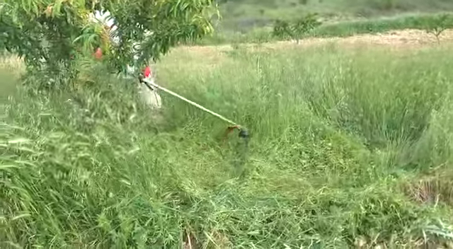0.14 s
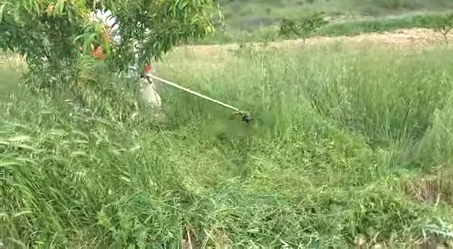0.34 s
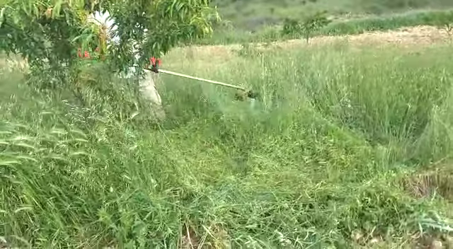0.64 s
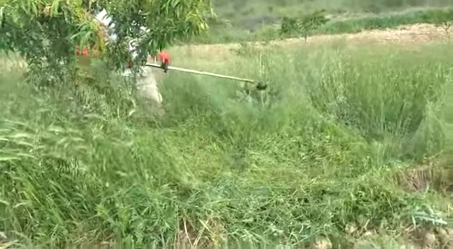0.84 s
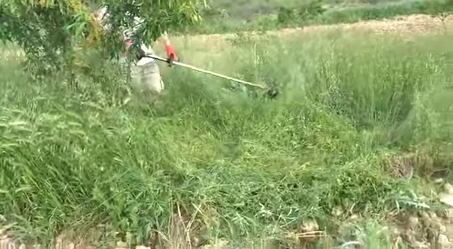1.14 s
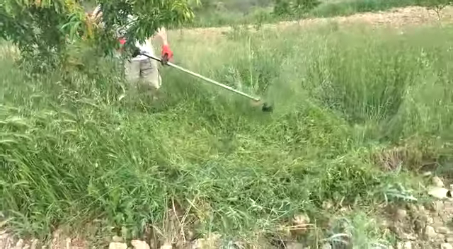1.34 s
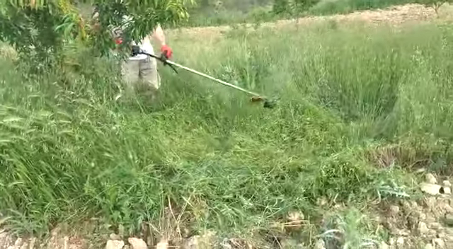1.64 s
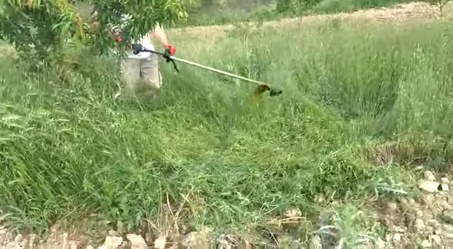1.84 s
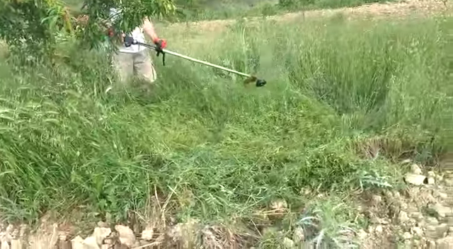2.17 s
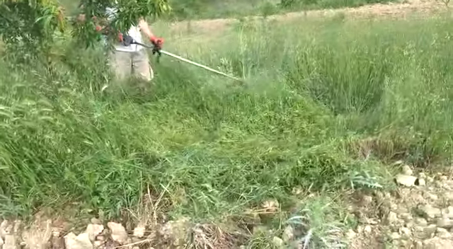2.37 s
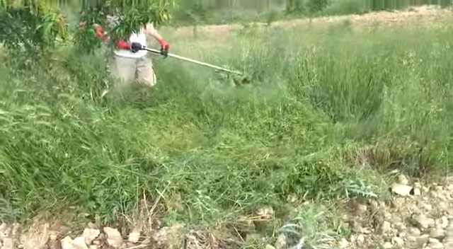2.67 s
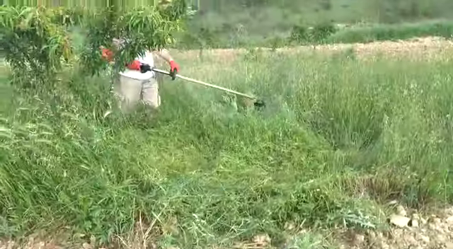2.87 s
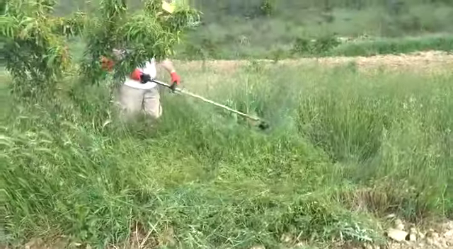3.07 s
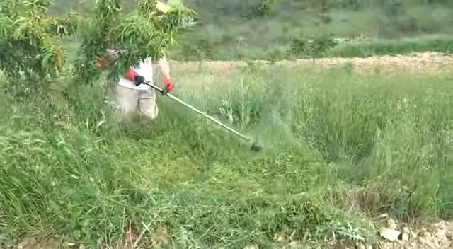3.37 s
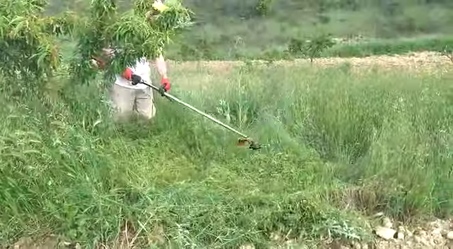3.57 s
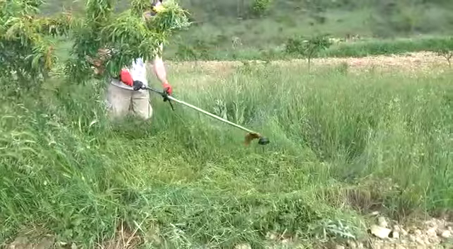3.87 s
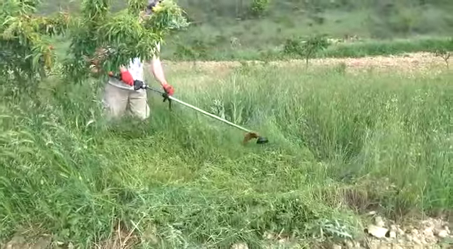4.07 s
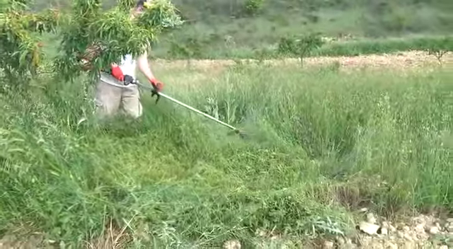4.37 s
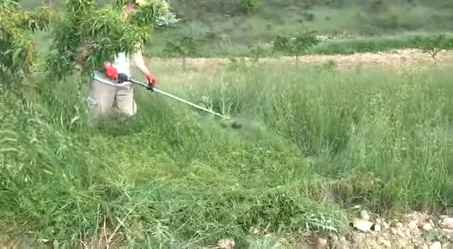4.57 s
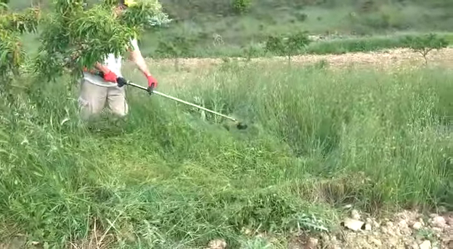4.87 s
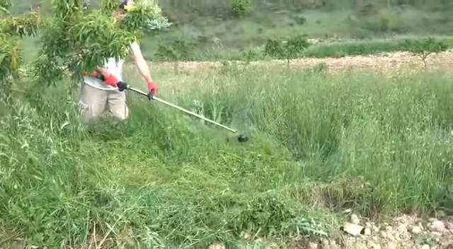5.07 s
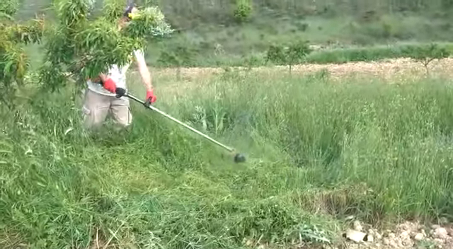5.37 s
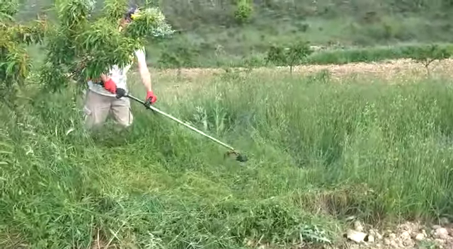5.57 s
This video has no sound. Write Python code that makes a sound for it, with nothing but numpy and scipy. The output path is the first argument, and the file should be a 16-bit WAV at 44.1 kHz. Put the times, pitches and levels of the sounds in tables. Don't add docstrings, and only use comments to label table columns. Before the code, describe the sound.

A two-stroke petrol brushcutter buzzes at high revs outdoors, its note sagging with each bite as nylon line swishes and snaps through tall grass.

```python
import sys
import numpy as np
from scipy import signal
from scipy.fft import rfft, irfft, next_fast_len
from scipy.io import wavfile
from scipy.ndimage import uniform_filter1d

SR = 44100
rng = np.random.default_rng(int(sys.argv[2]) if len(sys.argv) > 2 else 0)


def magnitude_from_level(level_db):
    exponent = np.asarray(level_db, float) / 20
    return 10 ** exponent


def master(y):
    cut = np.clip(np.atleast_2d(y).T, -1, 1)
    pcm = np.round(cut * 32767)
    wavfile.write(sys.argv[1], SR, pcm.astype(np.int16))


N = 252252


def rms_one(x):
    return x / np.sqrt(np.mean(x ** 2) + 1e-20)


def in_time(rows):
    return np.interp(np.arange(N) / SR, *np.transpose(rows))


def at_hz(points, hz, axis=1):
    points = np.array(points)
    return np.interp(np.log(hz + 1), np.log(points[:, 0]), points[:, axis])


def shaped(x, response):
    size = next_fast_len(N + 4096)
    hz = np.arange(size // 2 + 1) * SR / size
    return irfft(rfft(x, size) * response(hz), size)[..., :N]


def band(x, low_hz, high_hz, order=2):
    edges_hz = [low_hz, min(high_hz, .45 * SR)]
    return signal.sosfilt(signal.butter(order, edges_hz, "band", fs=SR, output="sos"), x)


def drift(rate_hz):
    hop = 32
    knots = np.arange(0, N + SR, hop)
    r = np.exp(-2 * np.pi * rate_hz * hop / SR)
    slow = signal.lfilter([1], [1, -2 * r, r * r], rng.standard_normal(len(knots)))
    return np.interp(np.arange(N) + SR, knots, rms_one(slow))


def per_turn(turns):
    return rng.standard_normal(4000)[turns.astype(int)]


# start in seconds, deepest point in seconds, end in seconds, drag in Hz of lost firing rate.
BITES = [(.183, .498, .744, 49.3), (.548, .634, .667, 24.4), (1.068, 1.349, 1.594, 12.8),
         (2.052, 2.33, 2.6, 32.7), (2.428, 2.468, 2.68, 18.1), (3.046, 3.382, 3.628, 18.9),
         (4.021, 4.059, 4.501, 13.5), (4.192, 4.366, 4.642, 34.8), (4.555, 4.578, 4.728, 21.3),
         (5.126, 5.387, 5.611, 30.4), (5.416, 5.463, 5.483, 36.7)]


def speed():
    free_hz, flywheel_s, start_sag_hz = 136.19, .2065, 1.5
    drag = np.zeros(N)
    for start, deepest, end, drag_hz in BITES:
        drag += in_time([(start, 0), (deepest, drag_hz), (end, 0)])
    r = np.exp(-1 / (flywheel_s * SR))
    return free_hz - signal.lfilter([1 - r], [1, -r], drag, zi=[start_sag_hz])[0]


# time in seconds, clearance from -1 to 1.
CLEARANCE = [(0.0, -0.66), (0.19, -0.43), (0.31, -0.24), (0.79, -0.15), (1.19, 0.72), (1.36, 0.21),
             (1.68, -0.61), (1.84, -0.16), (2.13, 0.24), (2.58, -0.28), (2.84, 0.52), (3.15, 0.8),
             (3.64, -0.62), (3.99, 0.37), (4.39, -0.3), (5.04, 1.0), (5.21, 0.67), (5.72, -0.41)]
# time in seconds, turn from -1 to 1.
BODY_TURN = [(0.0, 0.39), (0.36, -0.4), (0.52, 0.12), (0.91, 0.36), (1.31, -0.38), (1.46, 0.12),
             (1.79, 0.49), (2.01, -0.18), (2.39, 0.051), (2.9, 0.35), (3.24, -0.51), (3.49, 0.27),
             (3.86, 0.31), (4.11, -0.55), (4.32, 0.24), (4.99, -0.057), (5.28, -0.49), (5.72, 0.16)]


def levels(laws, hz):
    step = (hz - 125) / 10
    return np.array(laws) @ [np.ones(N), step, step ** 2, in_time(CLEARANCE), in_time(BODY_TURN)]


# frequency in Hz, level in dB.
MUFFLER = [(450, -13), (600, -5.5), (800, -15.5), (950, -8), (1100, -17), (1250, -20.5), (1450, -22),
           (1700, -27.5), (2100, -32), (2420, -22.5), (2700, -39), (2900, -20), (3150, -38)]
PORT_TIMING = [1.5, -1, 1, -1, 3, 3.5, -1, 5, -12, 0.5, 8, 6.5, -4]
# firing order, extra level in dB.
FAN_ORDERS = [(18, 5), (22, 7)]
# frequency in Hz, noise level in dB per Hz.
PUFF = [(40, -37), (100, 2.5), (220, -6.5), (310, -15), (450, -4.5), (900, -6), (1400, -3.5), (2000, -2.5),
        (2700, -39), (3500, -28)]


def exhaust(turns, hz, first_db, third_db, fourth_db, fifth_db, high_db):
    turns = turns + .0018 * drift(45)
    tones = np.zeros(N)
    port_db = dict(enumerate(PORT_TIMING, 4)) | dict(FAN_ORDERS)
    low_db = {1: first_db - .4, 2: first_db - 8.0, 3: third_db - 6.5}
    upper_db = {4: fourth_db, 5: fifth_db}
    for k in range(1, 25):
        muffled_db = upper_db.get(k, high_db) + at_hz(MUFFLER, k * hz) + port_db.get(k, 0)
        level_db = low_db.get(k, muffled_db)
        waver_db = 1.72 * (k > 3) * drift(1.6) + 0.82 * drift(32)
        late = -.12 if k < 6 else 0
        phase = 2 * np.pi * k * (turns - late) - 0.0352 * k * k
        tones += np.sqrt(2) * magnitude_from_level(level_db + waver_db) * np.cos(phase)

    gate = magnitude_from_level(0.28 * np.cos(2 * np.pi * (turns - .1)) + 0.8 * per_turn(turns + 0.33))
    puff = rms_one(shaped(gate * rng.standard_normal((2, N)), lambda f: magnitude_from_level(at_hz(PUFF, f))))
    knock = magnitude_from_level(9 * np.cos(np.pi * (turns - .1)) ** 6 + 2 * per_turn(turns + .4))
    rattle = rms_one(band(knock * rng.standard_normal((2, N)), 1570, 6000))
    return tones * [[1], [0]] + magnitude_from_level(high_db - 10) * puff + magnitude_from_level(high_db - 13.5) * rattle


def hum(head, hum_db):
    tone = np.zeros(N)
    for k, db in [(1, -1.4), (3, -20.5)]:
        tone += magnitude_from_level(db + 0.5 * drift(3)) * np.cos(4 * np.pi * k * head)
    return np.sqrt(2) * magnitude_from_level(hum_db) * tone * [[1], [0]]


# low edge in Hz, high edge in Hz, offset in dB,
# weaker line's deficit in dB, lag in turns of the head.
LINE_BANDS = [(2380, 4190, -1.5, 1, 0.16), (3944, 6700, -5.5, -1.5, 0.061), (7060, 8420, 2, -2.5, 0.19),
              (8700, 11640, -2.5, -1, 0.008), (11350, 15900, 9.5, -4, 0.0039)]
LINE_SWELL = [3, 3.5, 5, 11, 7]
# frequency in Hz, level in dB.
LINE_COLOUR = [(2300, -4.5), (2900, 0), (3400, -2), (4400, 1), (5400, 7), (6800, 7), (8300, -8.5),
               (9500, 11), (11500, -7), (13000, -10), (16000, -8.5)]


def whistle(head, bands_db):
    out, gusty = 0, drift(16.0)
    grit = magnitude_from_level(1.6 * np.minimum(rng.exponential(1, N), 5))
    strength = rng.standard_normal(4000)
    for row, swing_db, level_db in zip(LINE_BANDS, LINE_SWELL, bands_db):
        low_hz, high_hz, offset_db, weak_db, lag = row
        turn = head - lag
        line_pass = 2 * turn + 2.5
        bite = 1.1 + .3 * strength[line_pass.astype(int)] + .2 * per_turn(line_pass)
        pass_db = swing_db * np.cos(2 * np.pi * turn) ** 4 * np.clip(bite, 0, 1.7)
        uneven_db = .5 * weak_db * np.cos(2 * np.pi * turn)
        gate = magnitude_from_level(pass_db - uneven_db + 0.094 * gusty + 0.72 * drift(21))
        noise = band(gate * grit * rng.standard_normal((2, N)), low_hz, high_hz, order=3)
        local_rms = np.sqrt(uniform_filter1d(np.mean(noise ** 2, axis=0), size=6000))
        out = out + magnitude_from_level(level_db + offset_db) * noise / local_rms
    return shaped(out, lambda f: magnitude_from_level(at_hz(LINE_COLOUR, f)))


# time in seconds, peak in dB.
CRACKS = [(.4161, -15), (.6025, -16), (2.248, -17), (2.298, -14), (2.3145, -14), (2.331, -16), (2.407, -15),
          (2.4405, -14), (3.9805, -14), (4.001, -15), (4.0186, -11), (4.0191, -13), (4.0286, -6.5),
          (4.0388, -3), (4.0697, -8), (4.0899, -2), (4.1113, -6), (4.1305, -10), (4.2585, -9), (4.3823, -5),
          (4.404, -9), (4.4687, -14), (5.103, -10), (5.156, -12), (5.4505, -8), (5.4619, -7)]


def cracks():
    clicks = np.zeros((2, N))
    at = np.round(np.array(CRACKS)[:, 0] * SR).astype(int)
    clicks[:, at] = magnitude_from_level(np.array(CRACKS)[:, 1] + 16) * [[1], [.8]]
    clicks[:, at + 21] = -.4 * clicks[:, at]
    clicks = clicks + 1e-18
    return band(clicks, 3700, 8500) + magnitude_from_level(-8) * band(clicks, 8500, 14000)


# time in seconds, level in dB, upper rumble in dB against that level.
GUSTS = [(.055, -36, -11), (.15, -35, -24), (.259, -36, -18), (.639, -37, -22), (.93, -40, -17),
         (1.412, -41, -24), (1.59, -44, -7), (1.756, -27, -19), (1.87, -30, -10), (2.12, -37, -1),
         (2.365, -33, -5), (2.474, -34.5, 1), (2.804, -36, -12), (2.849, -35, -17), (2.963, -31, -14),
         (3.243, -38, -21), (3.482, -29, -22), (3.577, -34, 1), (3.677, -35, -20), (3.776, -34, -29),
         (3.901, -30, -21), (3.991, -30, -20), (4.121, -25, -17), (4.265, -29, -18), (4.355, -31, -21),
         (4.465, -28, -14), (4.59, -31, -26), (4.724, -42, 1), (4.874, -29, -17.5), (4.994, -31, -25)]


def wind():
    t = np.arange(N) / SR
    lull_db, flutter_db = -44, 5.5
    deep = magnitude_from_level(lull_db + flutter_db * drift(17))
    upper = magnitude_from_level(-72 + flutter_db * drift(20))
    for s, level_db, upper_db in GUSTS:
        deep += magnitude_from_level(level_db) * np.exp(-np.minimum(((t - s) / 0.042) ** 2, 40))
        upper += magnitude_from_level(level_db + upper_db) * np.exp(-np.minimum(((t - s) / 0.012) ** 2, 40))
    low = rms_one(band(rng.standard_normal((2, N)), 62, 106, order=1))
    high = rms_one(band(rng.standard_normal((2, N)), 118, 220, order=2))
    even = np.sqrt(uniform_filter1d((low[0] - low[1]) ** 2 / 2, size=1300) + .1)
    return magnitude_from_level(-8.5) * deep * low / even + magnitude_from_level(8.5) * upper * high


# frequency in Hz, level in dB,
# lead in radians, share from 0 to 1 that is the same sound.
PORTS = [(99, -18.5, -0.27, 0.24), (208, -22, 0.84, 0.44), (422, -28, -1, 0.43), (556, -10, 0.21, 0.24),
         (940, -13, -0.35, 0.61), (1700, -6, -0.41, 0.25), (2940, -2, -0.64, 0.72), (4070, 2, 0.86, 0.33),
         (6400, 0, 1, 0.098), (9000, -2, 1, 0.057), (10300, 1, 0.3, 0.27), (11900, 3, 0.8, 0.12),
         (15500, 0, -.2, 0.12)]


def ports(sound):
    share = lambda f: np.clip(at_hz(PORTS, f, axis=3), 0, 1)
    level = lambda f: magnitude_from_level(at_hz(PORTS, f, axis=1))
    lead = lambda f: np.exp(1j * at_hz(PORTS, f, axis=2))
    same = shaped(sound[0], lambda f: level(f) * np.sqrt(share(f)) * lead(f))
    scattered = shaped(sound[1], lambda f: level(f) * np.sqrt(1 - share(f)))
    return sound[0] + (same + scattered) * [[1], [-1]]


# level in dB, dB per speed step, dB per step squared,
# dB per clearance, dB per turn.
ENGINE_LAWS = [
    (-33, 1, -0.06, 1.5, 3.5),
    (-33.5, 4, .5, .3, 3.5),
    (-28, 3.5, -0.65, 6, 4.4),
    (-30.5, -8, -2.85, 7.5, 17.5),
    (-32, -4, -0.47, -1, 3.5),
    (-24.5, 0.73, -0.43, 1.1, 1.2),
]
# level in dB, dB per speed step,
# dB per step squared, dB per clearance, dB per turn.
LINE_LAWS = [(-30, -0.94, -0.5, 4.3, 2.5), (-26, 0.7, -1.2, 7.9, 6.5), (-27.5, 2.1, -0.74, 6.6, 6.5),
             (-34, 3.5, -2.5, 10.2, 4.5), (-35, 1.8, 0.63, 0.57, -7)]
# time in seconds, level in dB.
EXHAUST_AIM = [(0, .1), (.3, 2), (.55, 1.5), (.8, 0), (1.3, -1), (1.75, 1), (1.95, 0.8), (2.2, 1.5),
               (2.55, 1), (2.9, -1.4), (3.4, 0), (3.9, 1), (4.15, 2), (4.6, 1), (4.9, -0.2), (5.2, 0.5),
               (5.5, 3), (5.72, 2.9)]


def scene():
    hz = speed()
    first_db, hum_db, third_db, *upper_db = levels(ENGINE_LAWS, hz)
    aim_db = in_time(EXHAUST_AIM)
    turns = np.cumsum(hz) / SR
    head = .7385 * turns
    line = hum(head, hum_db) + whistle(head, levels(LINE_LAWS, hz))
    engine = exhaust(turns, hz, first_db, third_db + 1.8 * aim_db, *(upper_db + aim_db))
    return ports(engine + line + cracks()) + wind()


# time in seconds, drop in dB.
DUCKS = [(0, 7.5), (0.219, 4.5), (.418, 5.5), (2.07, 2.5), (2.25, 0.05), (2.3, 1.37), (2.335, 2.78),
         (3.05, 2), (3.27, 1.6), (4.029, 10), (5.156, 3.5), (5.464, 1.5)]


def gain_control():
    t = np.arange(N) / SR
    recover_s, quick_share, quick_s = 1.804, 0.15, 0.063
    duck_db = np.zeros(N)
    for s, drop_db in DUCKS:
        since = np.abs(t - s)
        back = np.exp(-since / recover_s) + quick_share * np.exp(-since / quick_s)
        duck_db += drop_db * (t >= s) * back
    return magnitude_from_level(-duck_db)


def band_limit(x):
    return signal.sosfilt(signal.butter(12, 16470, fs=SR, output="sos"), x)


def record(dry):
    cross_delay_s, cross_fade_hz = 1 / 2355, 8500
    bass_lift_hz, low_cut_hz, top_hz = 384, 37, 15760

    def cross(f):
        return np.exp(-2j * np.pi * f * cross_delay_s) / np.sqrt(1 + (f / cross_fade_hz) ** 2)

    def lift(f):
        low_cut = np.sqrt(1 + (low_cut_hz / (f + 1)) ** 4)
        return np.sqrt(f ** 2 + bass_lift_hz ** 2) / (f + 1) / low_cut

    def top_cut(f):
        return magnitude_from_level(-60 * np.clip((f - top_hz) / 250, 0, 1))

    wide = shaped(dry - shaped(dry[::-1], cross), lift)
    mix = shaped(gain_control() * wide, top_cut)
    return band_limit(mix)


dry = scene()
out = record(dry)
master(out)
```